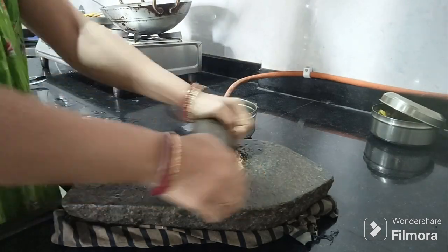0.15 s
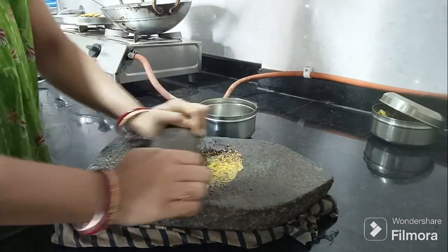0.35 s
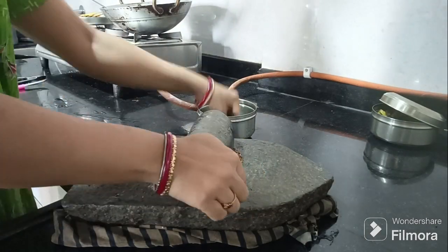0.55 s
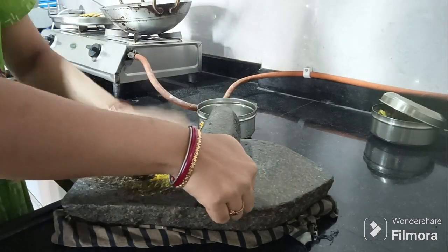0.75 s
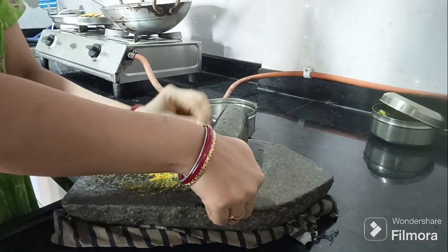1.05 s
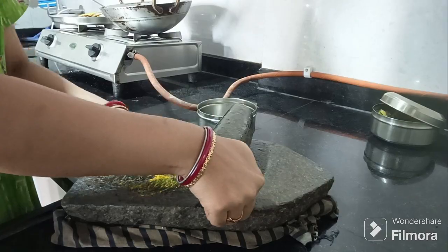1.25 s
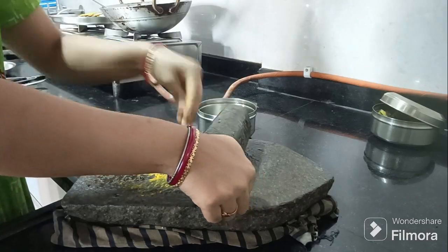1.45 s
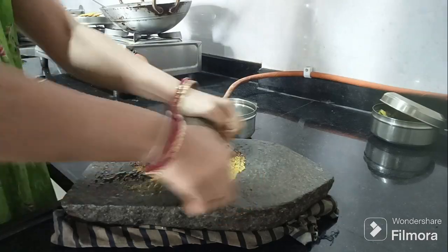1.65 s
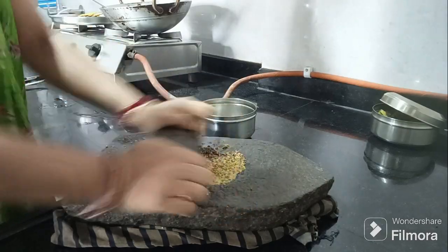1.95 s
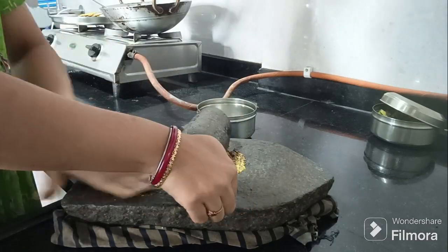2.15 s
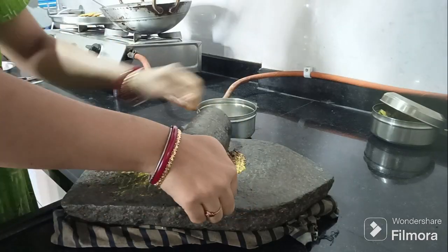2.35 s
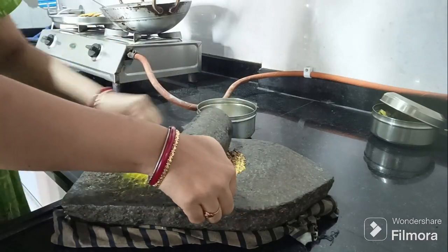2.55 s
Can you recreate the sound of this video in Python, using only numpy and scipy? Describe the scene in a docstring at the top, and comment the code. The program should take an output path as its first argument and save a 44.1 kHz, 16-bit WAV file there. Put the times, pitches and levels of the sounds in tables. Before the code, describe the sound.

A stone roller scrapes twice over a stone slab, crunching spices with a low rumble

```python
"""In a small tiled kitchen, a stone roller is pushed twice over a stone slab, crushing spices.
Cracking grit makes the rasp from clicks and ringing chips; filtered bumps and slab modes make the rumble.
The rumble swells and dips through each stroke and stops as the push ends; a soft low bump follows the second.
Decaying modes make two bangle clinks; filtered grit makes the fingers' brushes; dying tones make soft bumps and ticks.
Faint wavering tones squeak and groan as the stone sticks and slips. Heard close, by two small microphones."""
import sys
import numpy as np
from scipy import signal
from scipy.fft import rfft, irfft
from scipy.io import wavfile
from scipy.ndimage import uniform_filter1d

SR = 44100
rng = np.random.default_rng(int(sys.argv[2]) if len(sys.argv) > 2 else 0)


def put_to_file(sound):
    """Save the sound as 16-bit audio at rate SR, in the file named by the first command-line argument."""
    columns = np.atleast_2d(sound).T  # one column per channel
    safe = np.clip(columns, -1, 1)
    whole_steps = np.round(safe * 32767)
    wavfile.write(sys.argv[1], SR, whole_steps.astype(np.int16))


N = 119070  # samples, 2.7 s

# the two pushes of the roller: start_s, end_s
STROKES = [(0.15, 0.812), (1.85, 2.445)]
# loudness of the grit's rasp, one curve per stroke, before RASP_TRIM_DB: time_s, level_db
RASP_CURVES = [
    [(0.15, -87), (0.174, -40.5), (0.274, -31.5), (0.286, -33.5), (0.356, -30.5), (0.414, -31.5),
     (0.45, -27.5), (0.514, -33), (0.538, -31), (0.552, -33), (0.674, -31.5), (0.7, -37), (0.726, -30.5),
     (0.79, -31.5), (0.812, -49.5)],
    [(1.858, -76), (1.878, -36), (1.902, -43), (1.924, -31.5), (1.95, -36), (1.976, -30), (2.062, -34.5),
     (2.154, -29), (2.22, -35), (2.274, -29.5), (2.326, -36), (2.364, -32), (2.41, -34), (2.445, -54.5)],
]
# loudness of the slab's rumble, one curve per stroke, before RUMBLE_TRIM_DB: time_s, level_db
RUMBLE_CURVES = [
    [(0.15, -87), (0.174, -39.5), (0.27, -32), (0.33, -40.5), (0.5, -36), (0.6, -42), (0.78, -33),
     (0.812, -101)],
    [(1.85, -84), (1.888, -36), (2.056, -35), (2.16, -28), (2.19, -33.5), (2.33, -32.5), (2.412, -31.5),
     (2.445, -98)],
]
RASP_TRIM_DB, RUMBLE_TRIM_DB = 2.5, 4
# coarse seeds against the rasp, one value per stroke: level_db
CRUNCH_DB = [-13.5, -9]
# share of the slab's hum, one value per stroke: level_db
HUM_DB = [-2, 7]
# tone of the fine grit: freq_hz, relative_level_db
GRIT_SPECTRUM = [(100, -52), (500, -46.5), (1200, -12.5), (1800, -8), (2300, -0.5), (3000, -3), (3900, 3),
                 (4400, -3), (5400, 5), (7500, -2.5), (11000, -2.5), (16000, -2.5)]
# tone of the coarse seeds: freq_hz, relative_level_db
SEED_SPECTRUM = [(60, -56), (250, -1.5), (600, 2.5), (1500, -6.5), (3000, 5), (6000, -17)]
# tone of the bumps under the roller: freq_hz, relative_level_db
SLAB_SPECTRUM = [(25, -29), (45, -10.5), (80, -2.5), (125, -4.5), (175, 0.5), (260, -7.5), (320, -6),
                 (430, -18.5), (550, -28.5), (1000, -37.5), (3000, -58.5)]
# ringing modes of the slab, before HUM_DB: pitch_hz, level_db, t60_s
SLAB_MODES = [(233.6, 0.5, 0.17), (404, -20.5, 0.093), (463, -18, 0.064)]
GRIT_PER_S, SEEDS_PER_S, BUMPS_PER_S = 18000, 1900, 990
GRIT_SPREAD_DB, SEED_SPREAD_DB, BUMP_SPREAD_DB = 3, 7.5, 5.5
SEED_TOP_HZ, SLAB_LOW_CUT_HZ = 3940, 58
JUDDER_HZ, JUDDER_DB = 23, 2.23
# chips ring inside each crackle; the rate is for a crackle that reaches CUTOFF_HZ
CHIPS_PER_S, CHIP_DECAY_S, CHIP_SPREAD_DB, CHIP_DB = 3000, 0.0067, 3, -1

# single seeds bursting under the roller: middle_s, length_s, centre_hz, level_db
BURSTS = [(0.179, 0.038, 770, -38.5), (0.232, 0.022, 1510, -35), (0.485, 0.017, 3520, -32.5),
          (0.534, 0.016, 1500, -48), (0.745, .045, 845, -43.5), (1.902, 0.031, 850, -32.5),
          (1.914, 0.031, 5450, -28), (1.979, 0.072, 4240, -30), (2.074, 0.049, 1500, -33.5),
          (2.2, 0.12, 760, -35.5), (2.288, 0.024, 950, -39.5), (2.355, 0.023, 3900, -30)]
BURST_CLICKS_PER_S, BURST_SPREAD_DB = 1800, 4
# the roller catches and the stone groans: middle_s, length_s, pitch_hz, level_db
GROANS = [(0.35, 0.021, 234, -20), (0.482, 0.026, 209, -24), (0.59, 0.023, 367, -31.5),
          (0.628, 0.041, 320, -35), (0.665, 0.037, 161, -23.5), (0.765, 0.047, 225, -19),
          (2.358, 0.033, 226, -22.5), (2.4, 0.032, 125, -26), (2.395, 0.026, 440, -25)]
GROAN_SAG_PER_S, GROAN_WANDER = 2.5, 0.067  # shares of the pitch
# thin squeaks leading into the first stroke: middle_s, length_s, pitch_hz, level_db
SQUEAKS = [(0.11, .11, 3120, -53), (0.118, .09, 3540, -62)]
SQUEAK_WANDER_HZ = 25

# bangles rattling against the stone: start_s, length_s, level_db, scratch_db
CLINKS = [(0.813, .034, -21.5, -24.5), (1.731, 0.033, -16.5, -24)]
# bangle modes: pitch_hz, first_clink_db, second_clink_db, t60_s, left_over_right_db
CLINK_MODES = [(1047, -8, -3.5, 0.12, -6), (1715, -34.5, -20, 0.1, -12), (1910, -22.5, -8, 0.067, -4),
               (2220, -32, -15, 0.055, -10.5), (2990, -28, -8, 0.11, -1), (3450, -31, -15, .06, -1),
               (3620, -23, -10, 0.13, 9.5), (3705, -7, -15, 0.11, 9.5), (3794, -4, -10, 0.095, -18.5),
               (3975, -14, -7, 0.11, 7.5), (4975, 2.5, -8, 0.035, 13), (5180, -2.5, -4, 0.038, -15),
               (5275, 1, -6, 0.026, -7), (6190, -8.5, -12.5, 0.047, -8.5), (6900, -25, -10, 0.026, -3.5)]
# tone of the clinks' scratch: freq_hz, relative_level_db
SCRATCH_SPECTRUM = [(150, -12.5), (350, -1.5), (750, -10.5), (1750, 2.5), (3500, 8), (9600, 2.5),
                    (16000, -3)]
CLINK_FLUTTER_DB, CLINK_FLUTTER_HZ, CLINK_WANDER_HZ = 3.5, 140, 4
SCRATCH_LAG_S, MIC_LAG_S = 0.0074, 0.00024

# fingers and roller brushing the paste: middle_s, length_s, hiss_db, top_relative_db, rub_db, rub_hz
BRUSHES = [(0.0, 0.043, -33, -2.5, -49, 2730), (0.024, 0.08, -48, -13, -49, 2800),
           (0.886, 0.079, -70, -7, -53.5, 6200), (0.944, 0.039, -50, -10, -48.5, 3000),
           (0.994, 0.073, -46, -11, -45, 1594), (1.051, 0.024, -56, -3, -68.5, 1300),
           (1.169, 0.067, -44.5, -20, -46, 1610), (1.222, 0.028, -53, -21, -61, 1700),
           (1.321, 0.033, -46, 0, -86.5, 2400), (1.36, 0.07, -51, -2, -53, 1000),
           (1.407, 0.059, -44, 1.5, -53, 2920), (1.474, 0.085, -42.5, -8, -64, 840),
           (1.535, 0.058, -40, -2, -59, 3400), (1.655, 0.061, -50, -2, -56, 1690),
           (1.848, 0.11, -50.5, 5.5, -50.5, 5800), (2.476, 0.069, -38, -7, -70, 5000),
           (2.526, 0.039, -56, -6, -65, 3600), (2.574, 0.045, -55, -16, -51.5, 1050),
           (2.589, 0.094, -88, -16.5, -48, 830), (2.62, 0.041, -47, -22, -41.5, 2690)]
# tone of the brushing hiss: freq_hz, relative_level_db
PASTE_SPECTRUM = [(300, -15.5), (2500, -9.5), (4500, -3), (11000, 0), (16000, -5.5)]
AIR_HZ = 9540  # the hiss is brighter or duller above this
RUB_WIDTH = 0.45  # natural-log span of the rub band, roughly a share of its centre
# soft bumps of the roller: start_s, pitch_hz, level_db, t60_s
THUMPS = [(0.064, 172.4, -20.5, 0.056), (1.15, 85, -39, 0.31), (2.556, 89.7, -28, 0.29),
          (2.558, 156, -26.5, 0.074), (2.559, 285, -41.5, 0.087)]
# small ringing ticks as the fingers work: start_s, pitch_hz, level_db, t60_s
TICKS = [(1.148, 5100, -37, 0.086), (1.15, 1430, -48, 0.26), (1.24, 860, -49.5, .12),
         (1.395, 2692, -35.5, 0.076), (1.395, 5200, -38, 0.095), (1.455, 870, -44, 0.1)]
THUMP_RISE_S, TICK_RISE_S = 0.012, 0.0047

KITCHEN_T60_S, KITCHEN_DB = 0.096, -17
# tone of the background: freq_hz, relative_level_db
FLOOR_SPECTRUM = [(25, -14), (50, -19.5), (85, 0), (150, -5), (300, -19.5), (2500, -26.5), (10000, -29.5),
                  (16000, -54)]
FLOOR_DB = -59.5
# microphone resonances and notches: centre_hz, width_hz, left_db, right_db
MIC_PORTS = [(6500, 1300, -8.5, 1), (8520, 89, 8, 7), (9380, 1400, 2, -17), (13060, 70, 5.5, -1),
             (14000, 70, 13, 1.5), (15500, 550, 11, 4)]
CUTOFF_HZ = 15760


def grinding(grit):
    """Grit and seeds crack under the juddering roller; its bumps set the slab humming."""
    judder = from_db(JUDDER_DB * drift(JUDDER_HZ))
    rasp = colour(grit * judder, GRIT_SPECTRUM)
    seeds = crackle(SEEDS_PER_S, SEED_SPREAD_DB, SEED_TOP_HZ)
    crunch = colour(seeds * judder, SEED_SPECTRUM) * per_stroke(CRUNCH_DB)
    cracking = (rasp + crunch) * level(RASP_CURVES)
    return cracking * from_db(RASP_TRIM_DB) + slab_rumble() * from_db(RUMBLE_TRIM_DB)


def slab_rumble():
    """Uneven bumps excite the slab's modes; evened-out power lets the stroke curves set the loudness."""
    bumps = colour(grains(BUMPS_PER_S, BUMP_SPREAD_DB), SLAB_SPECTRUM)
    hum = sum(from_db(db) * rms_one(ring(bumps, hz, t60)) for hz, db, t60 in SLAB_MODES)
    slab = bumps + per_stroke(HUM_DB) * hum
    power = uniform_filter1d(np.mean(slab ** 2, axis=0), size=900)
    slab = slab / np.sqrt(power + 1e-9)
    low_cut = signal.butter(4, SLAB_LOW_CUT_HZ, "high", fs=SR, output="sos")
    return signal.sosfilt(low_cut, slab * level(RUMBLE_CURVES))


def crackle(rate, spread_db, top_hz):
    """Dry clicks, mixed with chips that each ring briefly at a pitch of their own."""
    t = np.arange(int(.04 * SR)) / SR
    shape = t / CHIP_DECAY_S * np.exp(-t / CHIP_DECAY_S)
    dry_clicks = rms_one(grains(rate, spread_db))
    pitch_hz = top_hz * rng.random((2, N))
    sizes = grains(CHIPS_PER_S * top_hz / CUTOFF_HZ, CHIP_SPREAD_DB)
    chips = np.zeros((2, N + len(t)))
    for side, i in zip(*np.nonzero(sizes)):
        tone = np.sin(2 * np.pi * pitch_hz[side, i] * t)
        chips[side, i:i + len(t)] += sizes[side, i] * shape * tone
    return dry_clicks + from_db(CHIP_DB) * rms_one(chips[:, :N])


def bursts():
    """Each seed gives way in a quick run of coarse cracks, filtered to its own band."""
    cracks, out = grains(BURST_CLICKS_PER_S, BURST_SPREAD_DB), 0
    for middle, length, hz, db in BURSTS:
        husk = signal.butter(2, [hz / 1.6, hz * 1.6], "band", fs=SR, output="sos")
        out = out + from_db(db) * swell(middle, length) * rms_one(signal.sosfilt(husk, cracks))
    return out


def groans():
    """Short, low stick-slip tones that sag and waver in pitch."""
    out, t = 0, np.arange(N) / SR
    waver = GROAN_WANDER * np.array([drift(140), drift(130)])
    for middle, length, hz, db in GROANS:
        pitch_hz = hz * (1 + waver - GROAN_SAG_PER_S * (t - middle))
        cycles = np.cumsum(pitch_hz, axis=1) / SR
        # the microphones are a quarter cycle apart at the middle
        cycles = cycles - cycles[:, [int(middle * SR)]] + rng.random() + [[0], [.25]]
        out = out + from_db(db) * swell(middle, length) * np.sin(2 * np.pi * cycles)
    return out


def squeaks():
    """Faint, wavering stick-slip tones."""
    out = 0
    for middle, length, hz, db in SQUEAKS:
        cycles = np.cumsum(hz + SQUEAK_WANDER_HZ * drift(280)) / SR
        out = out + from_db(db) * swell(middle, length) * np.sin(2 * np.pi * cycles)
    return out


def clinks(grit):
    """Bangle modes build up and waver while the contact rattles, then die away; the contact also scratches."""
    out, t = 0, np.arange(N) / SR
    heard = t - MIC_LAG_S * np.array([[0], [1]])
    touching = sum(swell(s + length / 2, length * 2) for s, length, *_ in CLINKS)
    for hz, *mode_db, t60, pan_db in CLINK_MODES:
        push = 0
        for (s, length, db, _), own_db in zip(CLINKS, mode_db):
            push = push + swell(s + length / 2, length) ** 2.24 * from_db(db + own_db)
        flutter = from_db(CLINK_FLUTTER_DB * drift(CLINK_FLUTTER_HZ))
        r = from_db(-60 / (t60 * SR))
        size = signal.lfilter([1 - r], [1, -r], push * flutter + 1e-18)
        waver = np.cumsum(touching * CLINK_WANDER_HZ * drift(CLINK_FLUTTER_HZ)) / SR
        tone = np.sin(2 * np.pi * (hz * heard + waver + rng.random()))
        out = out + size * tone * from_db(pan_db * np.array([[.5], [-.5]]))
    scratch = colour(grit, SCRATCH_SPECTRUM)
    for s, length, _, scratch_db in CLINKS:
        shape = swell(s + length / 2 + SCRATCH_LAG_S, length * 1.646) ** 2
        out = out + scratch * shape * from_db(scratch_db)
    return out


def brushes(grit):
    """Light strokes over the paste: a fine hiss, brighter or duller, and a hollow rub."""
    hiss, out = colour(grit, PASTE_SPECTRUM), 0
    air = signal.sosfiltfilt(signal.butter(6, AIR_HZ, "high", fs=SR, output="sos"), hiss)
    other_grit = np.roll(grit, N // 2, axis=1)  # so rub and hiss use different grains
    for middle, length, hiss_db, air_db, rub_db, hz in BRUSHES:
        edges = hz * np.exp(np.array([-.5, .5]) * RUB_WIDTH)
        band = signal.butter(2, edges, "band", fs=SR, output="sos")
        rub = rms_one(signal.sosfilt(band, other_grit))
        tilted_hiss = hiss + air * (from_db(air_db) - 1)
        brush = tilted_hiss * from_db(hiss_db) + rub * from_db(rub_db)
        out = out + swell(middle, length) ** 2 * brush
    return out


def knocks(rows, rise_s):
    """Single dying tones, a quarter cycle apart at the two microphones: low bumps or small ticks."""
    out = 0
    for start, hz, db, t60 in rows:
        t = np.maximum(np.arange(N) / SR - start, 0)
        rise = 1 - np.exp(-(t / rise_s) ** 2)
        decay = np.exp(-np.log(1000) * t / t60)
        tone = np.array([np.sin(2 * np.pi * hz * t), np.cos(2 * np.pi * hz * t)])
        out = out + from_db(db) * rise * decay * tone
    return out


def kitchen(x):
    """A short, diffuse tail off the tiles: dulled noise that decays exponentially."""
    t = np.arange(SR // 2) / SR
    dull_noise = signal.lfilter([1], [1, -.6], rng.standard_normal((2, len(t))))
    tail = dull_noise * np.exp(-np.log(1000) * t / KITCHEN_T60_S)
    tail = tail / np.sqrt(np.sum(tail ** 2) / 2)
    return signal.fftconvolve(x, tail, axes=1)[:, :N]


def background():
    """Steady filtered noise, separate at each microphone."""
    return from_db(FLOOR_DB) * colour(rng.standard_normal((2, N)), FLOOR_SPECTRUM)


def from_db(db):
    """Decibels to gain."""
    return 10 ** (np.asarray(db) / 20)


def rms_one(x):
    """Scale to unit power."""
    return x / np.sqrt(np.mean(x ** 2) + 1e-20)


def level(curves):
    """Gain over time from one dB curve per stroke; silent between them, with softened corners."""
    t, gain = np.arange(N) / SR, 0
    for curve in curves:
        time_s, db = np.transpose(curve)
        gain = gain + from_db(np.interp(t, time_s, db, left=-200, right=-200))
    return uniform_filter1d(gain, size=150)


def per_stroke(dbs):
    """One steady gain for each stroke."""
    return level([[(start, db), (end, db)] for (start, end), db in zip(STROKES, dbs)])


def swell(middle, length):
    """A smooth rise and fall."""
    return np.cos(np.pi * np.clip((np.arange(N) / SR - middle) / length, -.5, .5))


def colour(x, spectrum):
    """Give a sound a smooth spectrum, at unit power."""
    hz, db = np.transpose(spectrum)
    f = np.arange(N + 1) * SR / (2 * N) + 1
    gain = from_db(np.interp(np.log(f), np.log(hz), db))
    return rms_one(irfft(rfft(x, 2 * N) * gain)[..., :N])


def drift(rate_hz):
    """Chance wandering with spread 1: noise through two equal low-pass poles."""
    r = np.exp(-2 * np.pi * rate_hz / SR)
    noise = rng.standard_normal(2 * N)
    return rms_one(signal.lfilter([1], [1, -2 * r, r * r], noise)[N:])


def grains(rate, spread_db):
    """Random clicks of uneven size at each microphone."""
    size = from_db(spread_db * np.minimum(rng.exponential(1, (2, N)), 5))
    return (rng.random((2, N)) < rate / SR) * size * rng.choice([-1, 1], (2, N))


def ring(x, hz, t60):
    """One decaying mode, as a two-pole resonator."""
    r, w = from_db(-60 / (t60 * SR)), 2 * np.pi * hz / SR
    return signal.lfilter([1, 0, -1], [1, -2 * r * np.cos(w), r * r], x + 1e-18)


def scene():
    """All the work at the slab, with the kitchen's tail and a quiet background."""
    grit = crackle(GRIT_PER_S, GRIT_SPREAD_DB, CUTOFF_HZ)
    work = grinding(grit) + bursts() + groans() + squeaks()
    work = work + clinks(grit) + brushes(grit)
    work = work + knocks(THUMPS, THUMP_RISE_S) + knocks(TICKS, TICK_RISE_S)
    return work + from_db(KITCHEN_DB) * kitchen(work) + background()


def record(dry):
    """Each microphone colours the treble in its own way; the top is cut steeply."""
    f, db = np.arange(N + 1) * SR / (2 * N), 0
    for hz, width, left, right in MIC_PORTS:
        db = db + np.array([[left], [right]]) * np.exp(-((f - hz) / width) ** 2)
    cut = 1 / np.sqrt(1 + (f / CUTOFF_HZ) ** 600)
    return irfft(rfft(dry, 2 * N) * from_db(db) * cut)[:, :N]


dry = scene()
out = record(dry)
put_to_file(out)
```